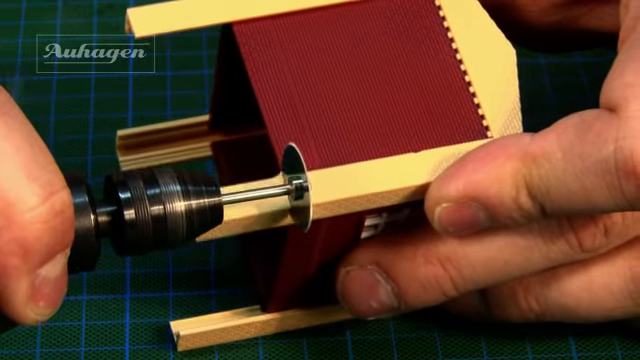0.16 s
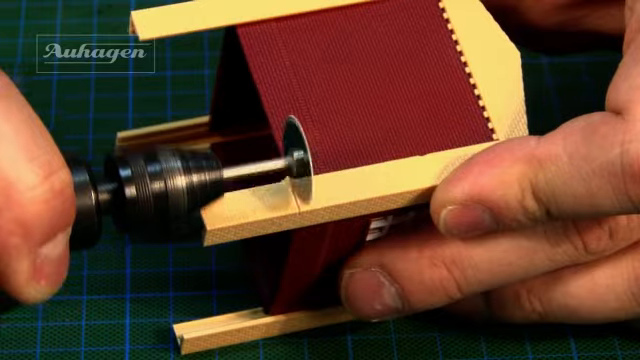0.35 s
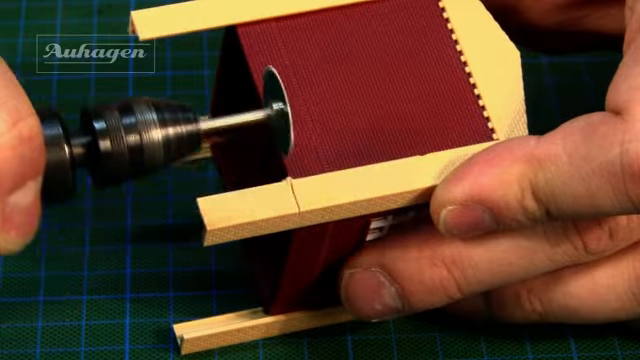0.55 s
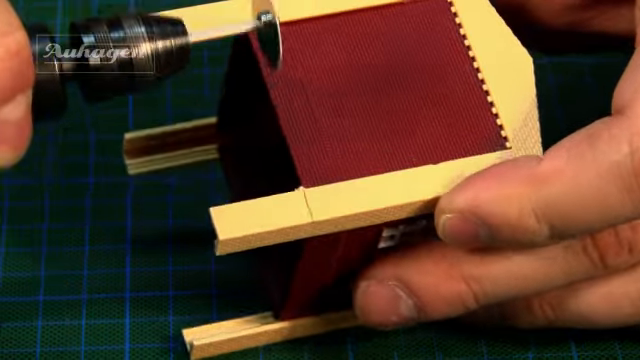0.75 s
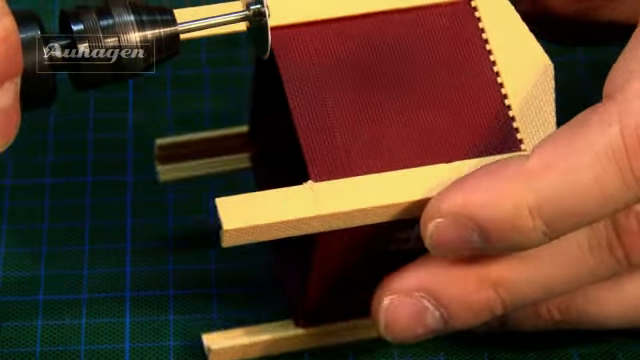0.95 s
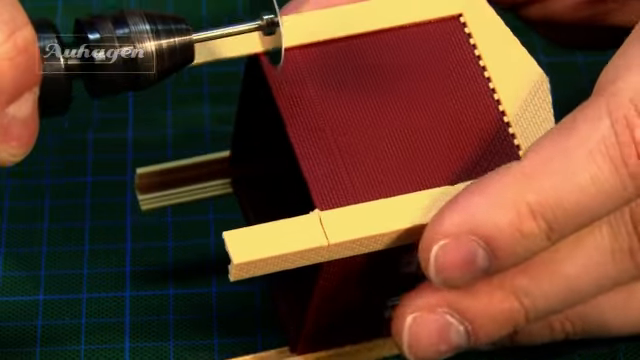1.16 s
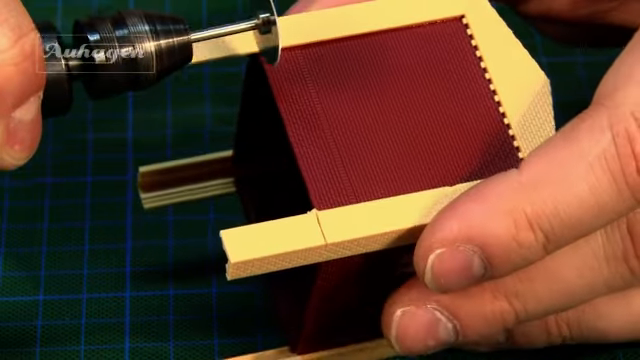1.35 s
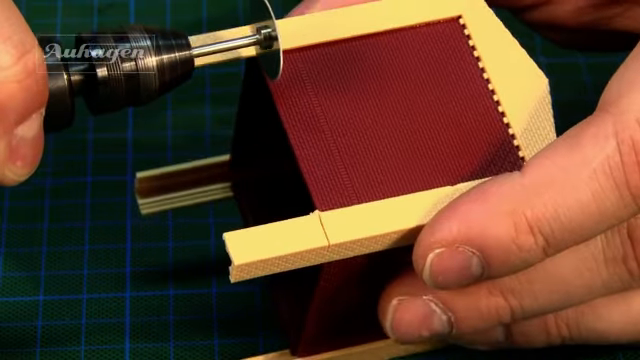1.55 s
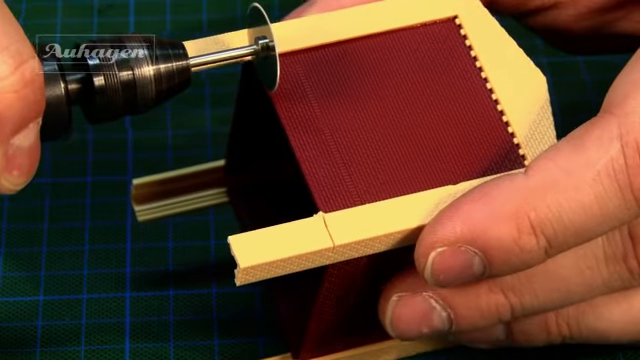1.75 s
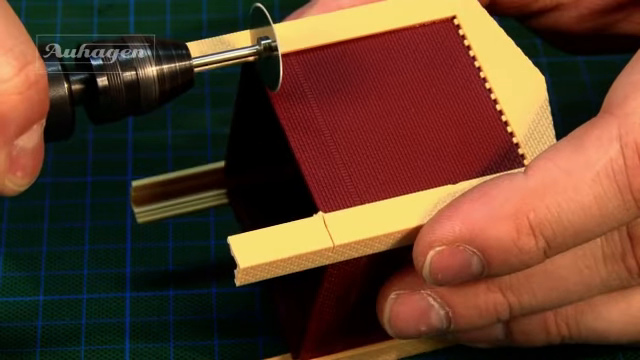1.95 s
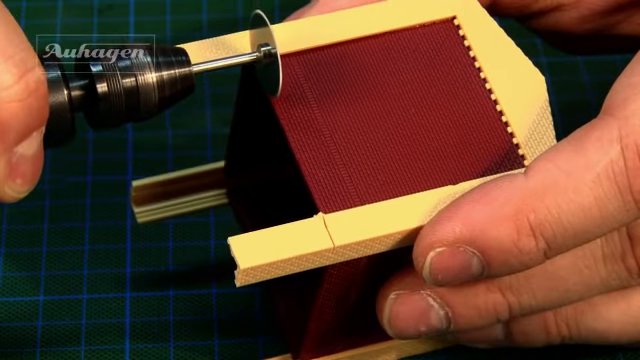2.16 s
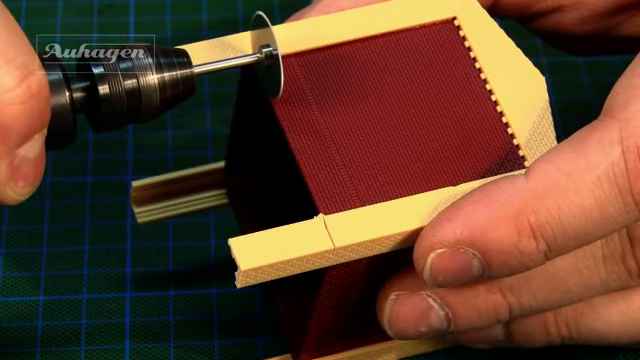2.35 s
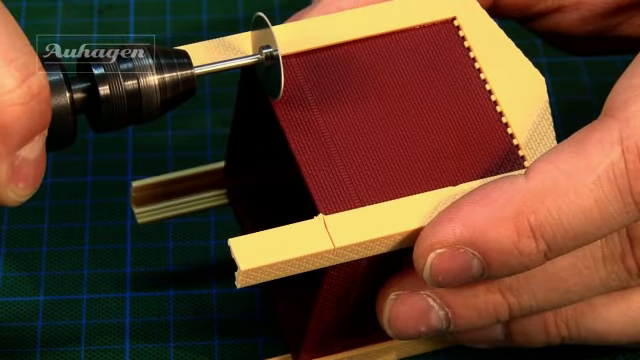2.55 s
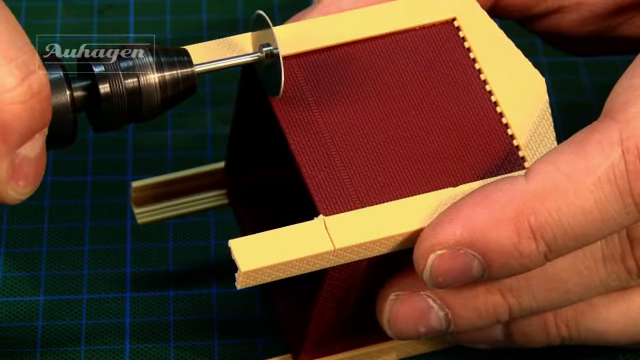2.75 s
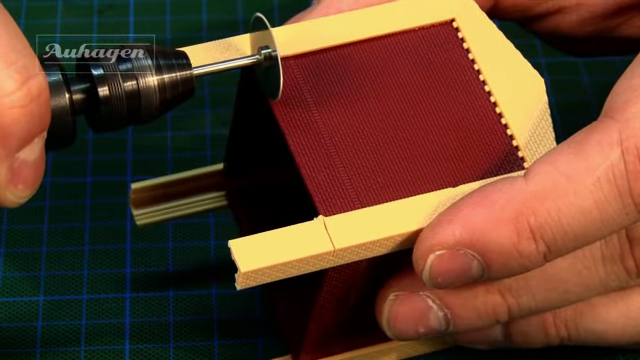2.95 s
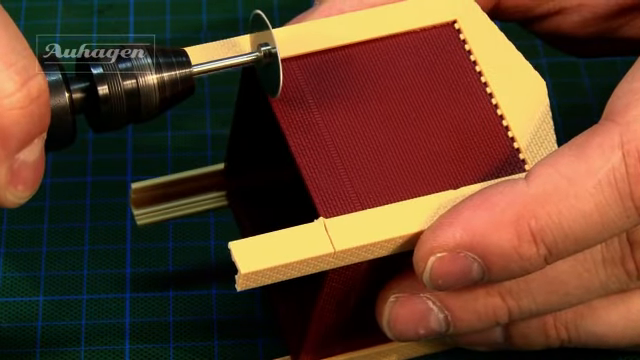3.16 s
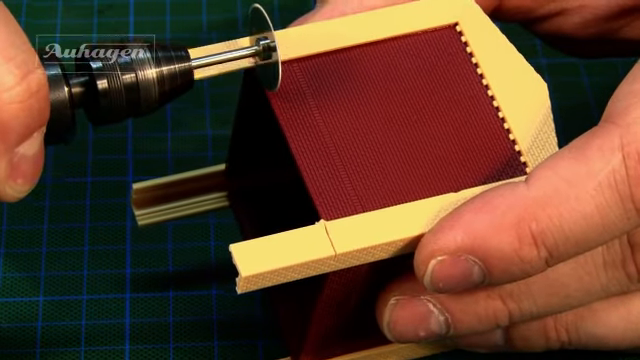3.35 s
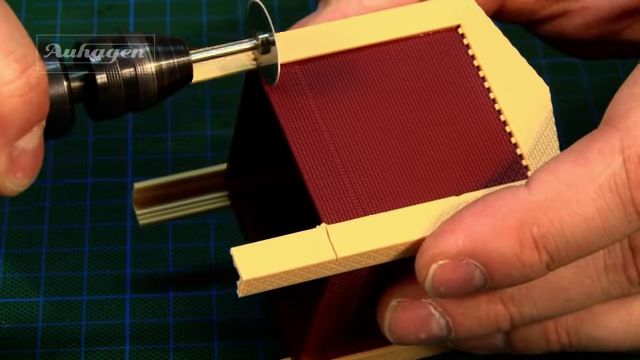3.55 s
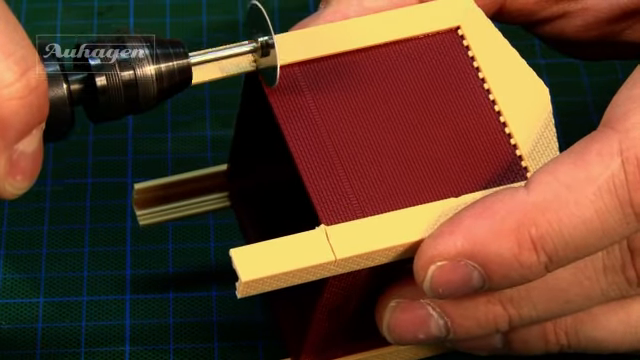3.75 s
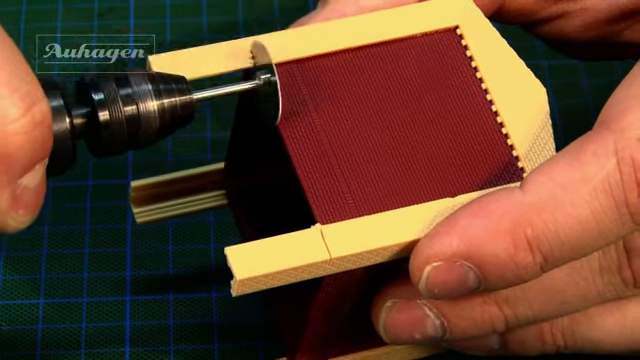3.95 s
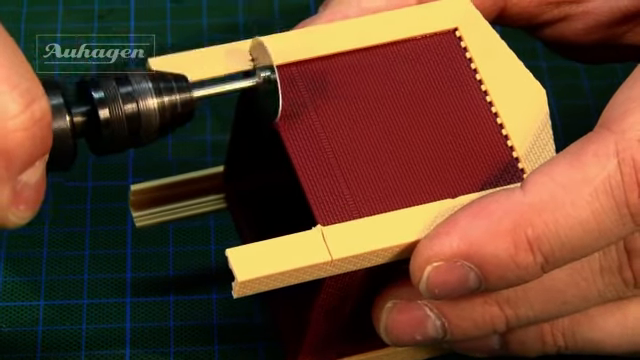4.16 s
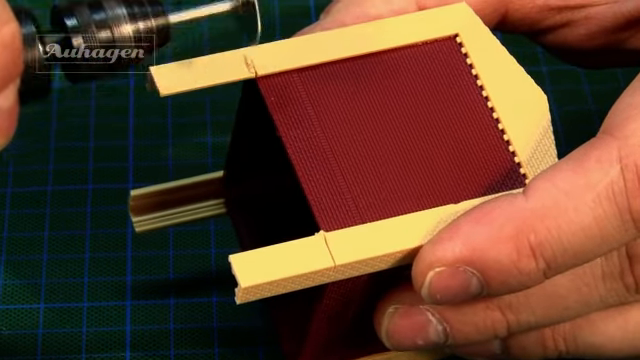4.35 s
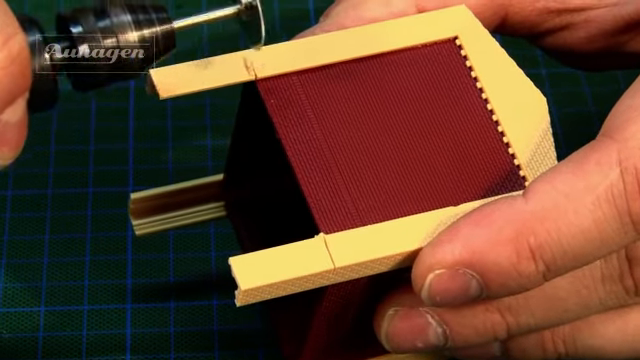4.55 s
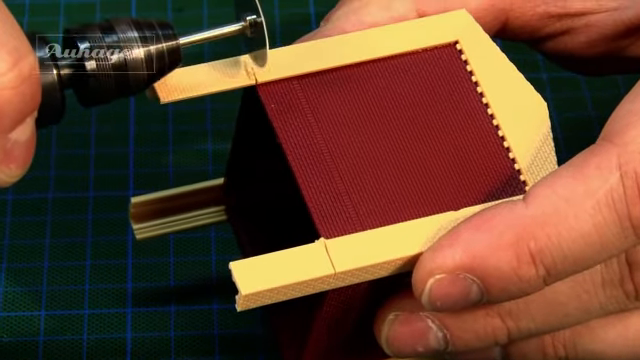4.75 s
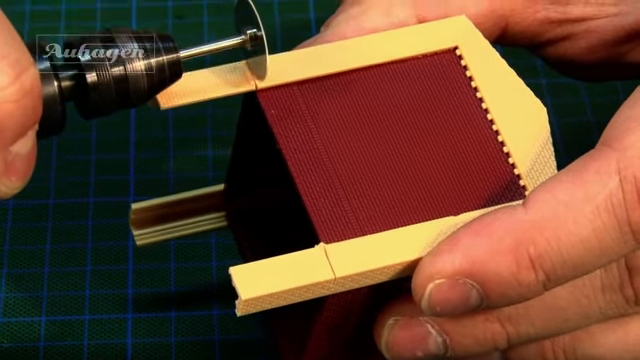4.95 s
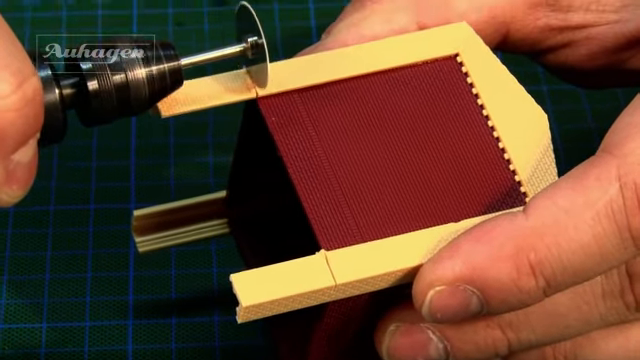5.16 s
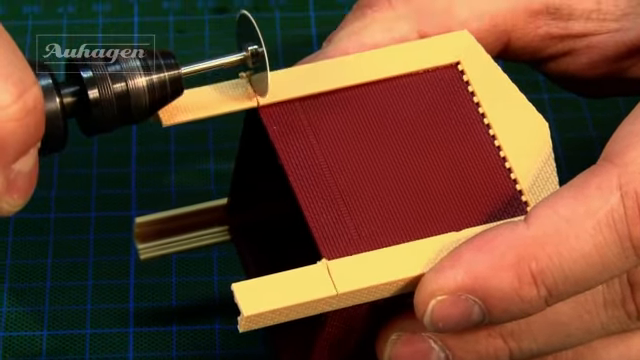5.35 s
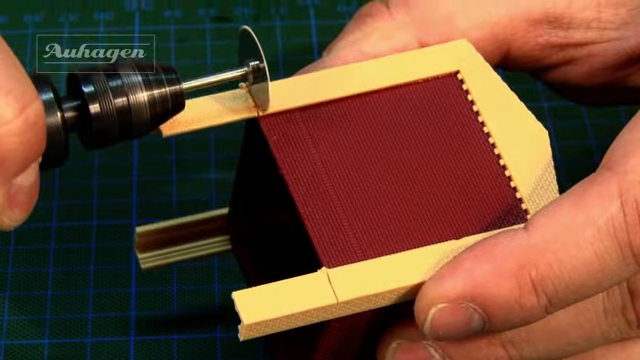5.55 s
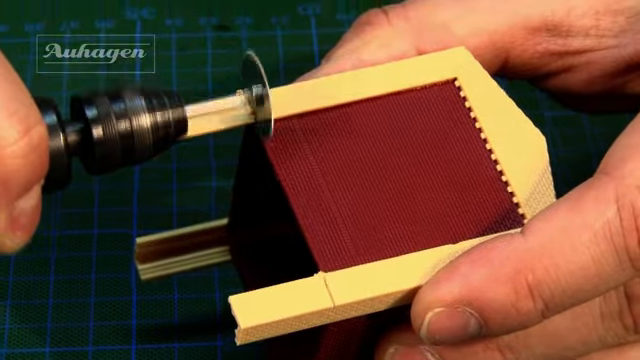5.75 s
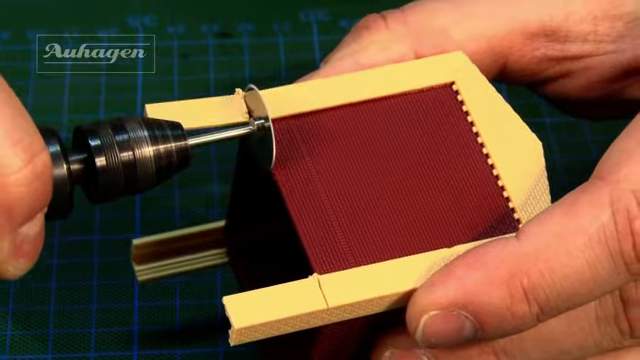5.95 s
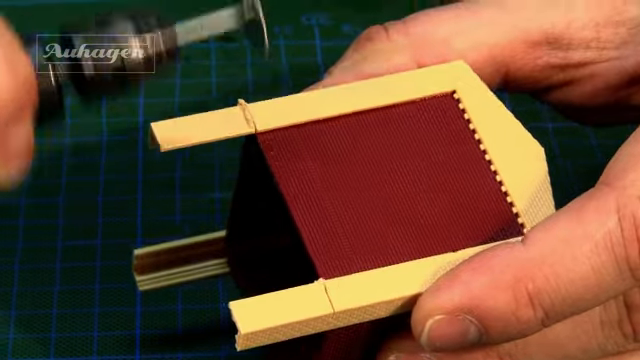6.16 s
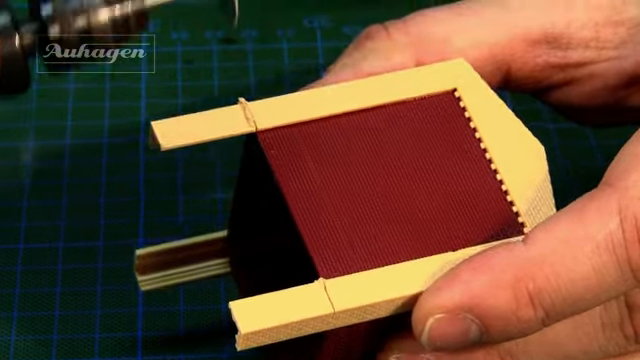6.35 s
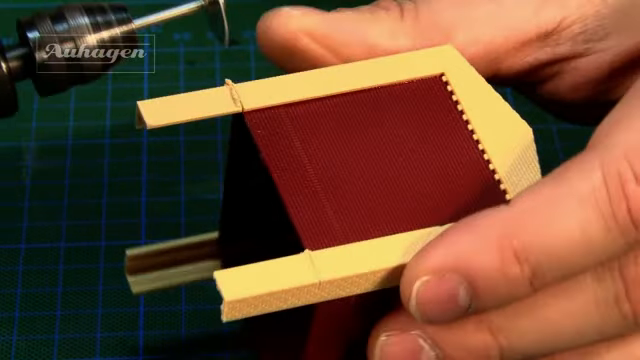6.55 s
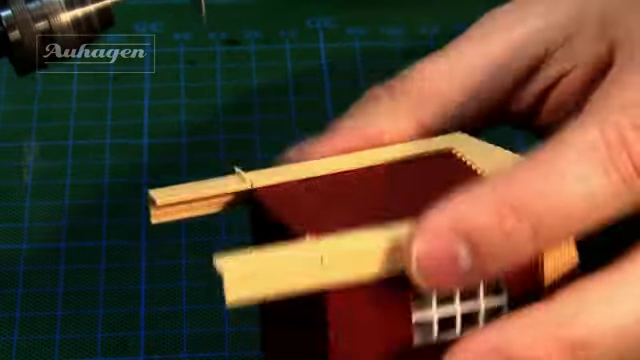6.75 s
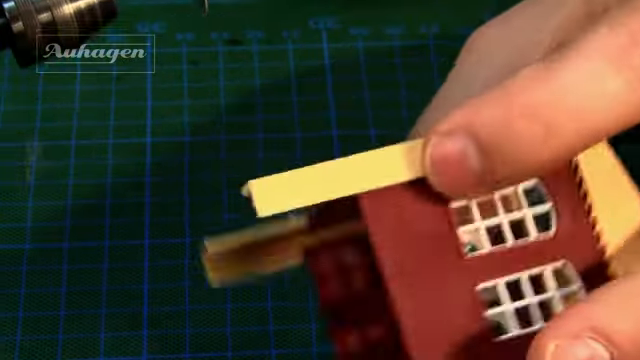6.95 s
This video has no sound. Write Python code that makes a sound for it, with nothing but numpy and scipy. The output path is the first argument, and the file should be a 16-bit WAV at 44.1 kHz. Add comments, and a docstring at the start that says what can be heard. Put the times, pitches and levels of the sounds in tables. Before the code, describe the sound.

Heard close at a workbench in a quiet room, a handheld rotary tool makes three short cuts in hollow plastic. The first is a slow, rough, chattering buzz, followed by about two seconds of high free-running whine. The next two start as a rasp and bog down into chatter and shrill squeals, with a brief whine between them. Finally the tool spins freely while the plastic piece is knocked once and slid softly.

```python
"""A gritty, chattering buzz: a rotary tool's cutting disc is labouring in the roof of a plastic model house.
Pulled free, it spins up to the bright whine of its ball bearing, then digs in for two more cuts.
The rim rasps once a turn and sets the hollow plastic buzzing; as the motor bogs down, the disc chatters
and squeals in the slot. The house gets bumped and slid about on the workbench.
All of it is close and mono, over faint room tone and mains hum."""
import sys
import numpy as np
from scipy import signal
from scipy.fft import rfft, irfft, next_fast_len
from scipy.io import wavfile
from scipy.ndimage import uniform_filter1d

SR = 44100
rng = np.random.default_rng(int(sys.argv[2]) if len(sys.argv) > 2 else 0)


def bounce(signal):
    """Save signal as a 16-bit WAV file at the path given by the first command-line argument."""
    frames = np.transpose(np.atleast_2d(signal))
    limited = np.clip(frames, -1, 1)
    pcm = np.round(limited * 32767).astype(np.int16)
    wavfile.write(sys.argv[1], SR, pcm)


N = 312669
T = np.arange(N) / SR

FULL_SPEED, BOG_SPEED, BOG_RANGE = 112, 88.6, 25   # turns per s; bogging is full BOG_RANGE below its onset
# the spindle running free: time_s, turns_per_s
FREE_SPEED = [(1.05, 112.2), (1.9, 110.75), (2.6, 110.75), (4.9, 112.3), (7.09, 112.8)]
# the plastic dragging it down, one curve a cut: time_s, turns_per_s
DRAGGED_SPEED = [
    [(0, 53.97), (.1, 55.25), (.16, 48.82), (.22, 48.88), (.29, 45.85), (.35, 56.29), (.4, 55.1),
     (.44, 63.1)],
    [(2.68, 110.5), (3.05, 105.6), (3.3, 98.7), (3.42, 98.7), (3.62, 93.6), (3.8, 92.2), (3.92, 77.6),
     (4.1, 64.5), (4.3, 51.5)],
    [(4.95, 112.3), (5.07, 107.6), (5.23, 105.9), (5.34, 96.5), (5.48, 94), (5.64, 84.4), (5.76, 78),
     (5.8, 72), (5.89, 68), (5.92, 60.5), (5.96, 59), (6, 52), (6.13, 47), (6.2, 49)],
]
# the mix of each cut:
# start_s, end_s, attack_s, fade_db_per_s, rasp_db, dust_db, wall_db, roof_db, rocking_db, growl_db
CUTS = [(-.01, 0.467, 0.0091, 41, -43, -58, -50, -67, -46.5, -49),
        (2.718, 4.31, 0.28, 2, -41.5, -38.5, -54.5, -58, -74, -48.5),
        (4.942, 6.195, 0.15, -1, -47.5, -53, -56, -65.5, -71.5, -54)]
# accents where the rim bites harder or catches an edge: start_s, length_s, roof_db, rasp_db, wall_db
SNAGS = [(0.414, 0.057, -57, -44, -67.5), (2.532, 0.2, -74, -54, -79), (2.71, 0.066, -48, -52, -76),
         (2.748, 0.22, -84, -43, -71), (3.102, 0.083, -58, -41.5, -56), (3.433, 0.15, -55, -64, -57),
         (3.862, 0.084, -49, -48, -71), (3.938, 0.21, -47.5, -44, -75), (4.215, 0.078, -39, -38.5, -62.5),
         (4.952, 0.12, -76, -53, -56), (5.047, 0.18, -86, -63, -51), (5.194, 0.11, -57, -71, -57),
         (5.32, 0.11, -60, -53, -77), (5.791, 0.087, -71, -39, -60), (5.892, 0.074, -44, -40, -77),
         (5.95, .09, -57, -73, -73), (6.146, 0.039, -40, -41, -68)]
# EQ of the scraping force: frequency_hz, gain_db
RASP_EQ = [(800, -12), (1400, 11.5), (2100, 2.5), (3700, -7.5), (6000, 5.5), (9500, -3.5), (16000, 1.5)]
# resonances of the scraping disc: pitch_hz, width_hz, gain_db
DISC_MODES = [(2162, 266, 0.5), (2916, 290, 5.5), (3940, 370, 5.5), (4650, 250, 6), (5390, 194, 5.5),
              (6120, 190, 0.5), (6880, 500, -3.5), (8210, 890, -3), (9250, 410, 0.5), (10400, 400, -4),
              (11250, 400, -7.5), (12450, 350, -4.5), (14600, 420, -7.5)]
# low resonances of the house's walls: pitch_hz, width_hz, gain_db
WALL_MODES = [(302, 280, -7.5), (427, 67, 5), (585, 121, -6)]
# midrange resonances of its roof: pitch_hz, width_hz, gain_db
ROOF_MODES = [(905, 570, -15.5), (1245.5, 44.6, 3), (1780, 32, -12)]
# the house rocking on its mat: pitch_hz, width_hz, gain_db
MAT_MODE = [(87, 28, 0)]
# the slot pinches the disc: start_s, length_s, level_db, fade_db_per_s
CHATTERS = [(-.02, 0.41, -37.5, 34), (0.229, 0.02, -52, 10), (0.328, 0.026, -56, 8), (3.911, 0.35, -39, 62),
            (5.795, 0.084, -40.5, 13)]
# ring of the disc snapping free: pitch_hz, width_hz, gain_db
SNAP_MODES = [(2210, 50, 4.5), (3120, 100, -2), (4180, 110, 2.5)]
# stick-slip squeals:
# start_s, length_s, first_hz, last_hz, level_db, waver_weight, throb_share, octave_db, twelfth_db
SQUEALS = [(.07, 0.068, 3090, 3080, -51, 33, 0.3, -25, -33),
           (3.312, 0.12, 2940, 2880, -45, 70, 1, 1.5, -12),
           (3.46, .27, 4750, 4680, -48.5, 45, 0.42, -22, -30),
           (3.775, 0.071, 5390, 5370, -39, 70, 0.5, -14, -30),
           (3.866, 0.069, 2420, 2260, -39.5, 86, 1, -12, -30),
           (3.89, 0.054, 4650, 4080, -35, 93, 0.5, -9, -20),
           (3.971, 0.0059, 5230, 5400, -23, 50, 0, -22, -30),
           (3.981, 0.0069, 5280, 5280, -20.5, 46, 0.2, -27, -30),
           (3.995, 0.0067, 5300, 5240, -26, 50, .2, -29, -30),
           (4.008, 0.008, 5480, 5400, -29, 50, 0.1, -27, -30),
           (4.02, 0.23, 5440, 5390, -39.5, 111, 0.56, -25, -30),
           (4.117, 0.0031, 5270, 5300, -24, 50, .2, -15, -27),
           (4.148, 0.0049, 5200, 5300, -27, 50, .2, -20, -30),
           (4.162, .007, 5240, 5300, -31, 50, .2, -20, -30), (3.983, 0.12, 4740, 4670, -40, 99, 1, 4, -4),
           (4.10, 0.12, 4840, 4700, -40.5, 58, 0.9, 5, -9),
           (4.175, 0.069, 4890, 4740, -33.5, 50, 0.2, -5, -12),
           (4.1, 0.14, 14230, 14280, -37, 60, 0.6, -40, -40),
           (4.0, 0.25, 4420, 4325, -37.5, 257, 0.4, -14, -30),
           (4.25, 0.015, 3196, 3030, -33.5, 79, 0, -15, -23),
           (4.297, 0.016, 3870, 4020, -42, 60, 0.1, -26, -12),
           (5.06, 0.12, 2800, 2780, -49.5, 134, 1, -20, -22),
           (5.2, 0.11, 6200, 6180, -52, 130, .9, -30, -30),
           (5.495, 0.054, 5440, 5350, -44.5, 80, 0.2, -11, -30),
           (5.797, 0.077, 4486, 3810, -39, 80, 0.6, -7, -24),
           (5.904, 0.0064, 4800, 5030, -31, 60, 0.05, -21, -20),
           (5.913, 0.029, 5230, 5010, -34, 92, 0.1, -3, -14),
           (5.924, 0.0053, 5090, 5120, -22, 44, 0.2, -14, -22),
           (5.913, 0.036, 9250, 9230, -35, 90, 0.4, -40, -40),
           (5.913, .04, 14450, 14400, -40, 200, .4, -40, -40),
           (5.946, 0.2, 9220, 9210, -31, 28, 0.17, -26, -37),
           (5.915, 0.22, 14600, 14580, -47.5, 70, 0.4, -40, -40),
           (6.0, 0.027, 2890, 3060, -46, 51, 0.9, -7, -16),
           (6.146, 0.0161, 5240, 4660, -31.5, 57, 0, -8, -12)]
# ripples on the bearing's balls: ripples_per_spin, lower_sideband_db, upper_sideband_db
BALL_RIPPLES = [(2, -23, -27), (3, -40, -25), (4, -11, -23.5), (5, -16.5, -25.5), (6, -22, -20.5),
                (7, -14.5, -18), (8, -15, -16.5), (9, -12, -22.5), (10, -9, -18), (11, -12, -26),
                (12, -15.5, -16.5), (13, -8.5, -21), (14, -18, -22), (15, -11.5, -21), (16, -27, -18.5)]
# one ripple sings out for a while: peak_s, half_length_s, ripples_per_spin, level_db
SWELLS = [(0.988, 0.19, 7, -58), (0.868, 0.19, 9, -48.5), (0.934, 0.23, 8, -53), (1.148, 0.49, 12, -52),
          (1.39, 0.22, 9, -52.5), (0.723, 0.16, 5, -54.5), (2.18, 0.2, 3, -56), (2.302, 1, 6, -51.5),
          (3.08, 0.17, 8, -52.5), (4.626, 0.018, 9, -50.5), (4.877, 0.12, 6, -52), (5.15, 0.15, 8, -62),
          (5.396, 0.11, 9, -57), (6.773, 0.18, 7, -50), (6.78, 0.11, 4, -57), (6.885, 0.22, 5, -53),
          (6.92, 0.4, 9, -49), (7.06, 0.093, 7, -59)]
# tilting the tool shifts the bearing's load: time_s, upper_sideband_lead_db
TILT = [(0, -10), (.9, 22), (1.4, 9.5), (1.9, 0.5), (2.6, 1.5), (4.7, 7.5), (6.4, 12), (6.8, 9.5),
        (7.09, 16.5)]
# ripples that growl under side load: ripples_per_spin, gain_db
GROWL_RIPPLES = [(5, -7), (6, -9.5), (7, 3), (8, -12), (9, -8.5), (10, -42), (14, -1), (15, -7.5)]
# ripples on the bearing's races: cycles_per_turn, gain_db
RACE_RIPPLES = [(16.04, -34), (16.95, -20.5), (17.9, -26.5), (18.78, -23), (19.14, -22), (20.14, -26),
                (21.14, -26.5), (23.14, -31), (24.3, -21), (25.84, -19.5), (26.19, -33), (31.84, -29),
                (34.56, -25), (35.38, -20.5), (47.99, -20.5), (56.71, -21), (61.41, -16.5)]
# EQ of the rolling hiss: frequency_hz, gain_db
ROLLING_EQ = [(1000, -49), (1700, -14), (1850, -16), (2470, -7.5), (2730, -5), (3050, -2.5), (5090, -3.5),
              (5540, -1.5), (7820, -6), (8250, 0), (9770, -15), (12300, -20), (15700, -29)]
# how the housing passes the whine on: frequency_hz, gain_db
HOUSING_EQ = [(4800, 2), (5450, -1.5), (6100, -0.5), (6550, 2), (7100, 4.5), (7700, -5), (8300, 3.5),
              (8850, -1.5), (9300, -5.5), (10200, -5.5), (11150, -6.5), (12200, -5.5), (13000, -6),
              (15000, -16)]
# bumps against the house, from the disc striking it in the slot or from the hand: time_s, level_db
KNOCKS = [(.445, -47), (4.249, -40), (4.26, -42), (4.283, -41), (5.915, -40.5), (5.932, -49), (5.949, -50),
          (6.003, -51), (6.022, -43), (6.169, -44), (6.780, -33.5)]
# its hollow ring: pitch_hz, gain_db, t60_s
HOUSE_MODES = [(306, -10.5, 0.013), (524, -3, 0.015), (830, 0, 0.008), (1180, -2.5, 0.017),
               (1520, -3, 0.0077)]
# fingers slide it over the mat: start_s, length_s, level_db
RUBS = [(6.765, 0.037, -65), (6.843, 0.042, -58), (6.884, 0.026, -52.5)]
# EQ of the room tone: frequency_hz, gain_db
ROOM_EQ = [(15, -35), (25, -19), (48, -16), (140, 0.5), (173, -9), (371, -9.5), (391, -13.5), (426, 0),
           (516, -9), (731, -2), (1230, -12), (1600, -7), (2080, -22), (3520, -120)]
# mains hum: pitch_hz, level_db
HUM = [(50, -81), (100, -84)]


def spindle_speed(spin_up_s=.1):
    """Turns per second: each cut drags the spindle down; let go, it recovers exponentially."""
    speed = free = automation(FREE_SPEED)
    for curve in DRAGGED_SPEED:
        start, end = curve[0][0], curve[-1][0]
        held = np.exp(-np.maximum(T - end, 0) / spin_up_s)
        speed = np.where(T >= start, free + held * (automation(curve) - free), speed)
    return speed


def cut_faders(release_s=0.021):
    """One gain per layer: each cut bites in, follows the push of the hand and lets go."""
    faders = 0
    for start, end, attack, fade, *layers_db in CUTS:
        gate = np.clip(np.minimum((T - start) / attack, (end - T) / release_s), 0, 1)
        push = gate * from_db(-fade * np.maximum(T - start, 0))
        faders = faders + np.outer(from_db(layers_db), push)
    return faders


def cutting(turns, bogged, rasp_gain, wall_gain, roof_gain, dust_gain):
    """Once a turn the rim scrapes the slot and shoves the house, whose walls and roof buzz."""
    roof_snag, rasp_snag, wall_snag = sum(np.outer(from_db(levels_db), window(start, start + length, 0.028))
                                          for start, length, *levels_db in SNAGS)
    # bogged in the later, deeper slots, the disc rubs all the way round
    pressure = contact(turns, sharpness=1.26) + 0.14 + bogged * (T > CUTS[0][1])
    repeating = .93 * (1 - bogged)   # share of the grit that comes back on every turn
    grit = np.sqrt(repeating) * rim_grit(turns) + np.sqrt(1 - repeating) * rng.standard_normal(N)
    rasp = np.hypot(rasp_gain, rasp_snag) * rim_rasp(turns, bogged, grit * pressure)
    dust = dust_gain * bogged ** 2 * dust_hiss(pressure)
    shove = rim_shove(turns, bogged, grit)
    roof = roof_buzz(shove, bogged, roof_gain, roof_snag)
    walls = wall_buzz(shove, turns, bogged, wall_gain, wall_snag)
    return rasp + dust + walls + roof


def contact(turns, sharpness, high_spot=0.1373):
    """The disc runs out of true, so its high spot presses on the plastic once a turn."""
    return np.exp(sharpness * (np.cos(2 * np.pi * (turns - high_spot)) - 1))


def rim_grit(turns, wear_hz=2.16, points=2048):
    """The same grains come round on every turn; their pattern slowly wears into another."""
    grit = 0
    for _ in range(3):
        rim = irfft(rfft(rng.standard_normal(points))[:points // 12], points)
        grit = grit + drift(wear_hz) * np.interp(turns % 1, np.arange(points) / points, rim)
    return levelled(grit)


def rim_rasp(turns, bogged, friction, swell_db=1.2):
    """Grinding grains and the high spot's sharp strike ring the disc."""
    grinding = levelled(friction * from_db(2.1 * drift(200)))
    strike = .35 * (1 - bogged) * levelled(contact(turns, sharpness=1300, high_spot=.2))
    scrape = levelled(resonate(coloured(grinding + strike, RASP_EQ), DISC_MODES))
    return scrape * from_db(swell_db * drift(15.4))


def dust_hiss(pressure, lead_s=0.041):
    """Flying dust adds air on top; it stops as the disc is drawn back, just before it is free."""
    spray = resonate(rng.standard_normal(N) * (pressure + 0.92), DISC_MODES)
    gate = sum(window(start, end - lead_s, 0.016) for start, end, *_ in CUTS)
    return levelled(cut_off(spray, 9000, "high", order=3)) * gate


def rim_shove(turns, bogged, grit):
    """The force on the house: a kick a turn plus gritty drag, both uneven when a slow disc snatches."""
    kick = np.gradient(contact(turns, sharpness=117)) * from_db((0.4 + 0.91 * bogged) * drift(36))
    grip = contact(turns, sharpness=1.7) + 0.77 * bogged * from_db(11.0 * drift(70))
    return levelled(kick) + (0.96 + 3.7 * bogged) * levelled(grit * grip)


def roof_buzz(shove, bogged, gain, snag, bog_db=9, surge_db=4.5):
    """The roof's midrange buzz comes and goes with the grip and grows as the motor bogs."""
    ring = resonate(cut_off(shove, 540, "high"), ROOF_MODES)
    level = gain * from_db(surge_db * drift(1) + bog_db * bogged)
    return np.hypot(level, snag) * levelled(cut_off(ring, 4700, "low"))


def wall_buzz(shove, turns, bogged, gain, snag, bog_db=-13, waver_db=1.5):
    """The walls give body, a little more when the turn rate's fourth harmonic meets their main mode."""
    ring = resonate(cut_off(shove, 232, "high", order=3), WALL_MODES)
    detune_hz = 4 * np.gradient(turns) * SR - WALL_MODES[1][0]
    lift = 1 + 0.12 / (1 + (detune_hz / 14) ** 2)
    level = np.hypot(gain * from_db(bog_db * bogged) * lift, snag)
    return level * levelled(cut_off(ring, 880, "low")) * from_db(waver_db * drift(8.3))


def rocking(turns, bogged, bog_db=-13.5):
    """The low end: the house rocks on its mat, and slow, heavy turns thump through to the bench."""
    sway = rms_one(resonate(resonate(contact(turns, sharpness=1.0), MAT_MODE), MAT_MODE))
    thump = cut_off(contact(turns, sharpness=13.0), 160, "low", order=3)
    thump = levelled(cut_off(thump, 52, "high"))
    return from_db(bog_db * bogged) * (sway + bogged * thump)


def chatter(turns, ring_db=-2.5, thud_db=-19):
    """On each turn the pinched disc scrapes in a burst, with a dry thud, then snaps free and rings."""
    level = sum(from_db(db - fade * np.maximum(T - start, 0)) * window(start, start + length, 0.0037)
                for start, length, db, fade in CHATTERS)
    bursts = rng.standard_normal(N) * contact(turns, sharpness=4.2, high_spot=0.12)
    snaps = np.diff(np.floor(turns - 0.154), prepend=-1) * from_db(-5.0 * drift(30))   # one click a turn
    scrape = cut_off(resonate(bursts, DISC_MODES), 1640, "high", order=4)
    scrape = levelled(cut_off(scrape, 5200, "low", order=1))
    thud = levelled(cut_off(cut_off(bursts, 1260, "low"), 550, "high"))
    ring = levelled(cut_off(resonate(snaps, SNAP_MODES), 2800, "high"))
    return level * (scrape + from_db(thud_db) * thud + from_db(ring_db) * ring)


def squeals(turns, bogged, roof_flex, bend_hz=35, flex_depth=4.7):
    """Stick-slip locks onto a bending mode of the disc; each turn swells it and bends its pitch up."""
    catches = contact(turns, sharpness=4.6, high_spot=0.32)
    catches += 0.73 * bogged * contact(turns, sharpness=3.6, high_spot=0.65)   # a slow disc catches twice
    ragged = from_db(2.5 * (1.5 + bogged) * drift(270))
    swing = levelled(np.tanh(2 * catches * ragged))
    wavers = [1.13 * drift(400) for _ in range(3)]
    out = np.zeros(N)
    for k, (start, length, first_hz, last_hz, db, waver, throb, *overtones_db) in enumerate(SQUEALS):
        gate = window(start, start + length, 0.0012)
        on = gate > 0
        pulse = throb * (swing[on] - 1)
        pitch_hz = np.linspace(first_hz, last_hz, on.sum()) + waver * wavers[k % 3][on] + bend_hz * pulse
        cycles = np.cumsum(pitch_hz) / SR + flex_depth * roof_flex[on]   # the flexing roof adds side tones
        partials = sum(gain * tone(n * cycles) for n, gain in enumerate(from_db([0, *overtones_db]), 1)
                       if n * first_hz < SR / 2)
        out[on] += from_db(db) * gate[on] * (1 + pulse) * partials
    return out


def bearing(turns, speed, growl_gain, spins_per_turn=8.285, slip=0.00081):
    """Balls and races whine and hiss, louder with speed; side load jams the balls into a pulsing growl."""
    level = from_db(-46 + 9.5 * np.log10(speed / FULL_SPEED))
    side_load = sum(window(start, end, 0.25) for start, end, *_ in CUTS)
    spin = spins_per_turn * (turns + slip * np.cumsum(drift(14.5) * np.gradient(turns)))
    whine = ball_whine(turns, spin, speed, side_load, level)
    growl = sum(from_db(db) * skid(ripples * spin, 130) for ripples, db in GROWL_RIPPLES)
    growl = growl_gain * growl * rms_one(contact(turns, sharpness=1.0, high_spot=0.61))
    races = from_db(-1) * (1 - .5 * side_load) * race_tones(turns)
    hiss = from_db(-6) * rms_one(coloured(rng.standard_normal(N), ROLLING_EQ)) * (1 + 0.12 * drift(130))
    sound = coloured(whine + growl, HOUSING_EQ) + level * (races + hiss)
    return cut_off(sound, 2010, "high", order=9)   # the small housing radiates little low end


def ball_whine(turns, spin, speed, side_load, level, cage_per_turn=.44, flutter=0.49, fine_db=-17.5):
    """Ripples on the balls sing at multiples of their spin, each split in two by the circling cage."""
    lean = from_db(automation(TILT) / 2)
    slowness = np.maximum(1 - speed / FULL_SPEED, 0)
    level = level * (1 - 0.55 * slowness), level
    singing, full_level = level   # a slow bearing sings less
    cage = cage_per_turn * turns
    whine = 0
    for ripples, lower_db, upper_db in BALL_RIPPLES:
        cycles = ripples * spin
        lower, upper = from_db(lower_db) / lean, from_db(upper_db) * lean
        strength = np.hypot(lower, upper)
        pair = lower * tone(cycles - cage + rng.random()) + upper * tone(cycles + cage + rng.random())
        pair = pair / strength * (1 + flutter * drift(9.2))
        swell = ripple_swell(ripples)
        # skidding smears the finer ripples most, and all of them when slow, loaded or swelling
        smear = 0.07 * ripples + 2.6 * slowness + .7 * side_load + .9 * np.minimum(swell / full_level, 1)
        voice = (pair + smear * skid(cycles, 19.0 * ripples)) / np.sqrt(1 + flutter ** 2 + smear ** 2)
        whine = whine + voice * np.hypot(singing * strength * (1 - 0.11 * side_load), swell)
    # still finer ripples sink into hearing at low speed
    fine = sum(skid((BALL_RIPPLES[-1][0] + k) * spin, 90) for k in range(1, 8))
    return whine + singing * from_db(fine_db) * fine


def ripple_swell(ripples):
    """Gain of one ripple as it rises and sinks in bell-shaped swells."""
    return sum(from_db(db) * np.exp(-np.minimum(((T - peak) / half) ** 2, 50))
               for peak, half, which, db in SWELLS if which == ripples)


def skid(cycles, width_hz):
    """Skidding balls smear a tone into a narrow band of noise, rms 1."""
    return (drift(width_hz) * tone(cycles) + drift(width_hz) * tone(cycles + 1 / 4)) / np.sqrt(2)


def race_tones(turns, flutter=0.49):
    """Ripples on the races add fluttering tones that track the turn rate."""
    wobbles = [1 + flutter * drift(32) for _ in range(4)]
    return sum(from_db(db) * wobbles[k % 4] * tone(multiple * turns + rng.random())
               for k, (multiple, db) in enumerate(RACE_RIPPLES))


def bumps():
    """Each bump, whether the bogged disc striking the house once a turn or a hand knocking it, rings the hollow
    house with a new balance; sliding rubs the same modes softly."""
    out = np.zeros(N)
    for (start, db), scatter_db in zip(KNOCKS, rng.normal(0, 0.62, (len(KNOCKS), len(HOUSE_MODES)))):
        at = int(start * SR)
        t = T[:min(SR // 10, N - at)]
        for k, (hz, mode_db, t60) in enumerate(HOUSE_MODES):
            decay = from_db(db + mode_db + scatter_db[k] - 60 * t / t60)
            out[at:at + len(t)] += (-1) ** k * decay * np.sin(2 * np.pi * hz * t)
    modes = [(hz, np.log(1000) / (np.pi * t60), db) for hz, db, t60 in HOUSE_MODES]
    rubbing = rms_one(resonate(rng.standard_normal(N), modes))
    out += rubbing * sum(from_db(db) * window(start, start + length, length / 2) for start, length, db in RUBS)
    softened = cut_off(out, 1800, "low", order=3)   # the plastic and the mat cushion the contacts
    return cut_off(softened, 220, "high")


def workshop(x, t60_s=0.32, wet_db=-17):
    """Adds short, dull reflections from the bench and walls."""
    t = T[:SR // 3]
    tail = cut_off(rng.standard_normal(len(t)), 4150, "low") * from_db(-60 * t / t60_s) * (t > .003)
    return x + from_db(wet_db) * signal.fftconvolve(x, tail / np.linalg.norm(tail))[:N]


def room_tone(noise_db=-70.5):
    """A faint bed of dark noise and mains hum."""
    noise = from_db(noise_db) * rms_one(coloured(rng.standard_normal(N), ROOM_EQ))
    return noise + sum(from_db(db) * tone(hz * T) for hz, db in HUM)


def from_db(db):
    """Decibels to gain."""
    return 10 ** (np.asarray(db) / 20)


def rms_one(x):
    """Scale to rms 1."""
    return x / np.sqrt(np.mean(x ** 2) + 1e-20)


def levelled(x):
    """Ride the gain to hold the rms at 1 over a few turns."""
    power = uniform_filter1d(uniform_filter1d(x ** 2, size=2600), size=1800)
    return x / np.sqrt(np.abs(power) + 1e-12)


def automation(points):
    """Straight lines through (time_s, value) points, at every sample."""
    return np.interp(T, *np.transpose(points))


def window(start, end, edge):
    """A gate between two times, with ramps inside them."""
    return np.clip(np.minimum(T - start, end - T) / edge, 0, 1)


def drift(rate_hz):
    """Smooth random modulation of rms 1, drawn at every 20th sample."""
    pole = np.exp(-40 * np.pi * rate_hz / SR)
    slow = signal.lfilter([1], [1, -2 * pole, pole * pole], rng.standard_normal(N // 20 + 3002))[3000:]
    return np.interp(np.arange(N) / 20, np.arange(len(slow)), rms_one(slow))


def coloured(x, eq):
    """Shape x with an EQ curve of (frequency_hz, gain_db) points."""
    hz, db = np.transpose(eq)
    size = next_fast_len(N)
    bins_hz = np.maximum(np.arange(size // 2 + 1) * SR / size, 1)
    gain = from_db(np.interp(np.log(bins_hz), np.log(hz), db))
    return irfft(rfft(x, size) * gain, size)[:N]


def cut_off(x, hz, kind, order=2):
    """A smooth low- or high-pass."""
    return signal.sosfilt(signal.butter(order, hz, kind, fs=SR, output="sos"), x)


def resonate(x, modes):
    """Parallel resonances of alternating sign."""
    out = 0
    for k, (hz, width, db) in enumerate(modes):
        r = np.exp(-np.pi * width / SR)
        feedback = [1, -2 * r * np.cos(2 * np.pi * hz / SR), r * r]
        band = signal.lfilter(np.array([1, 0, -1]) * (1 - r * r) / 2, feedback, x)
        out = out + (-1) ** k * from_db(db) * band
    return out


def tone(cycles):
    """A sine of rms 1."""
    return np.sqrt(2) * np.sin((2 * np.pi * (cycles % 1)).astype(np.float32))


def scene():
    """The spindle's speed drives the rasp, the whine, the chatter and the throb of the squeals."""
    speed = spindle_speed()
    turns = np.cumsum(speed) / SR
    bogged = np.clip((BOG_SPEED - speed) / BOG_RANGE, 0, 1)
    rasp_gain, dust_gain, wall_gain, roof_gain, rocking_gain, growl_gain = cut_faders()
    plastic = cutting(turns, bogged, rasp_gain, wall_gain, roof_gain, dust_gain)
    plastic += rocking_gain * rocking(turns, bogged) + bumps()
    whine = bearing(turns, speed, growl_gain * from_db(-7 * bogged))
    disc = chatter(turns) + squeals(turns, bogged, roof_flex=resonate(plastic, ROOF_MODES))
    return np.tile(workshop(plastic + whine + disc) + room_tone(), (2, 1))


def record(dry, cutoff_hz=15750):
    """A steep low-pass takes off the very top."""
    return signal.sosfilt(signal.ellip(12, .1, 80, cutoff_hz, fs=SR, output="sos"), dry)


dry = scene()
out = record(dry)
bounce(out)
```